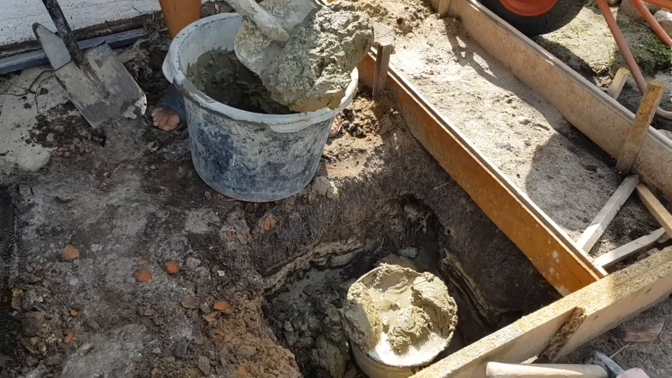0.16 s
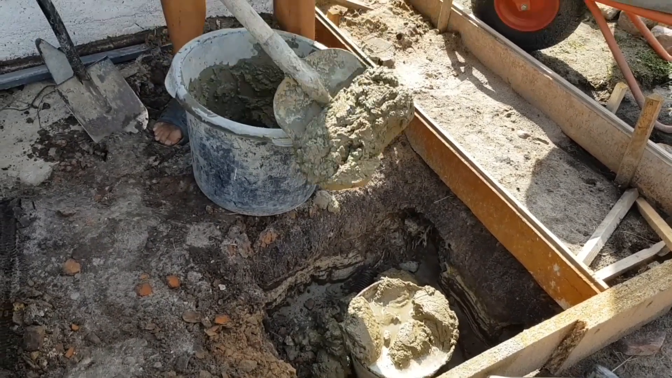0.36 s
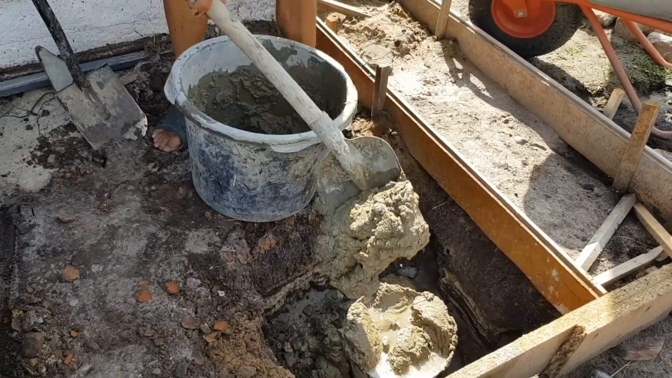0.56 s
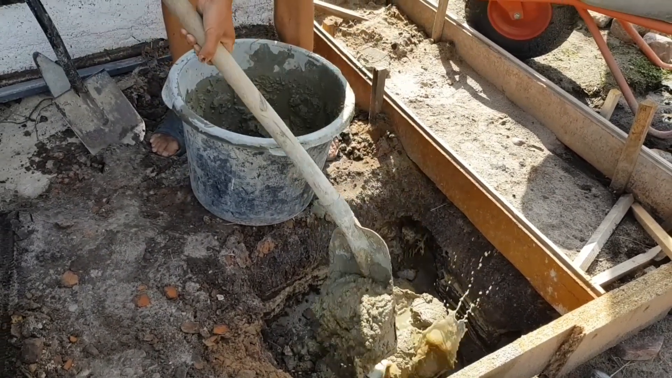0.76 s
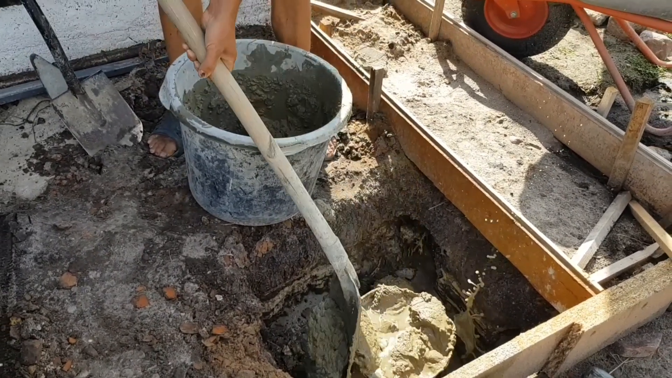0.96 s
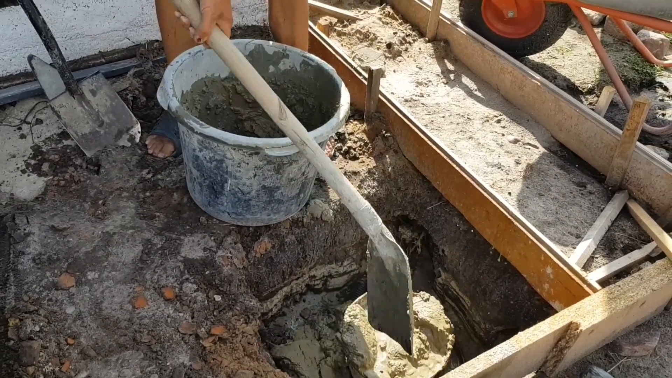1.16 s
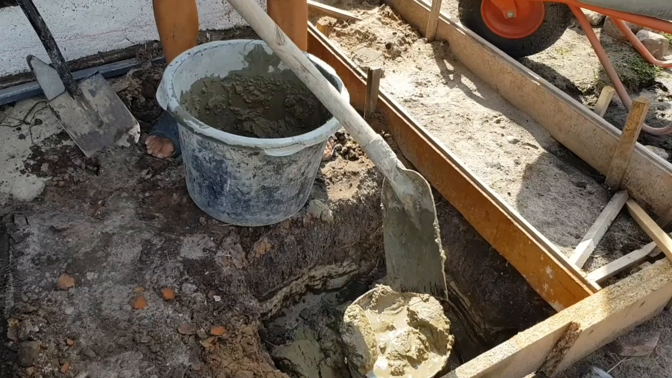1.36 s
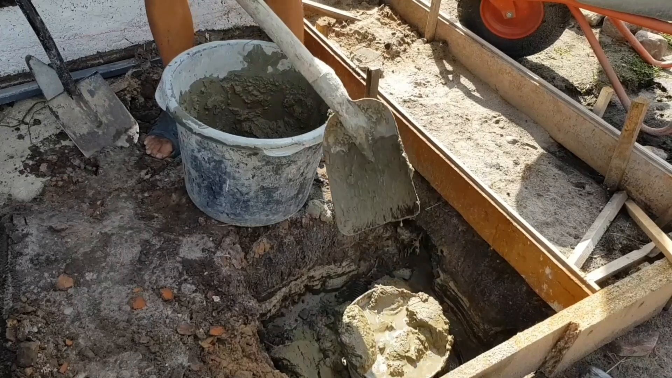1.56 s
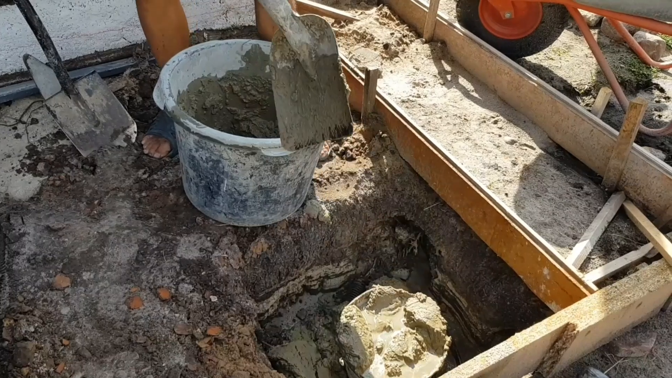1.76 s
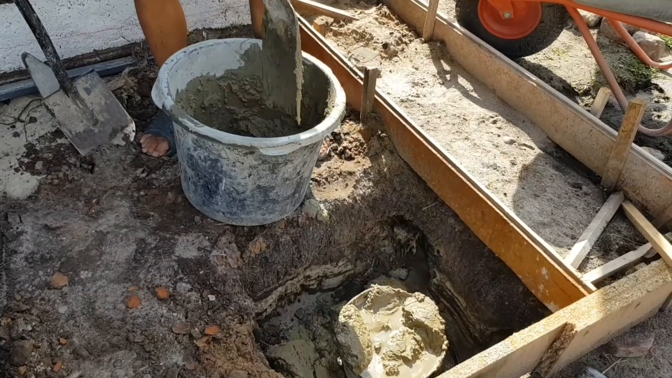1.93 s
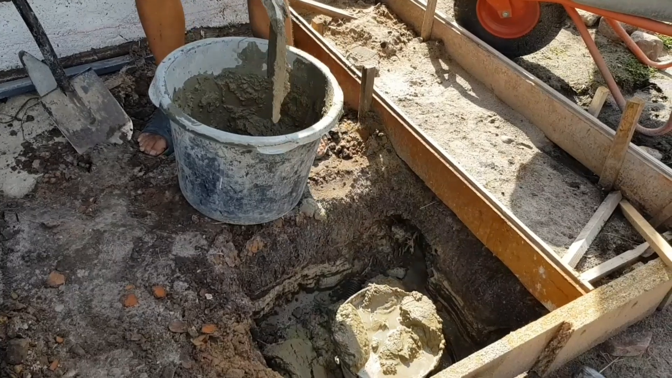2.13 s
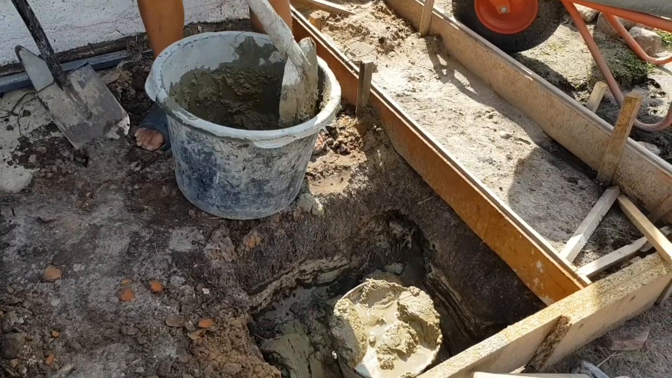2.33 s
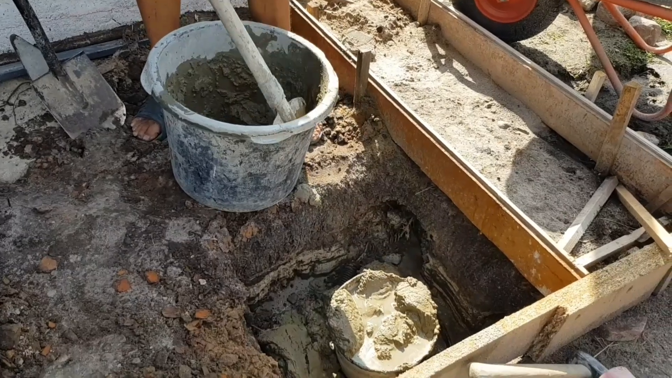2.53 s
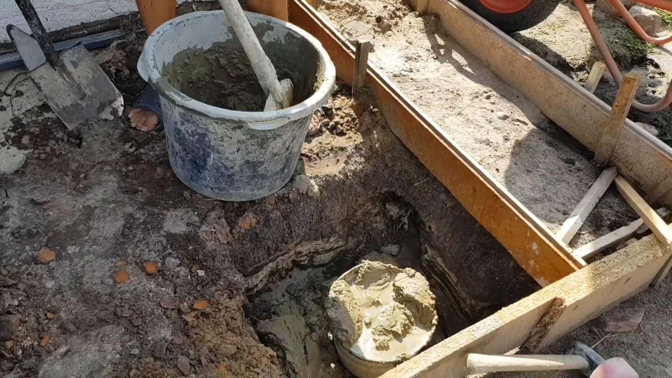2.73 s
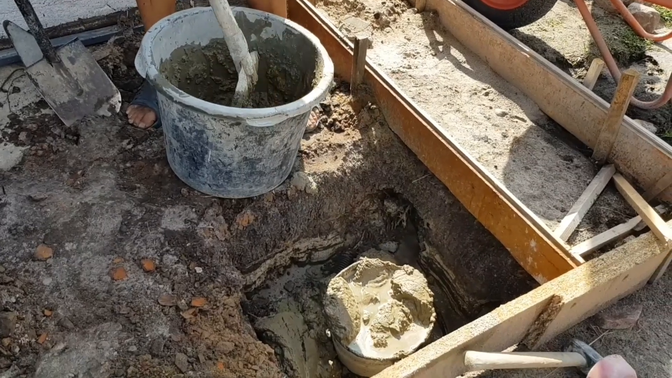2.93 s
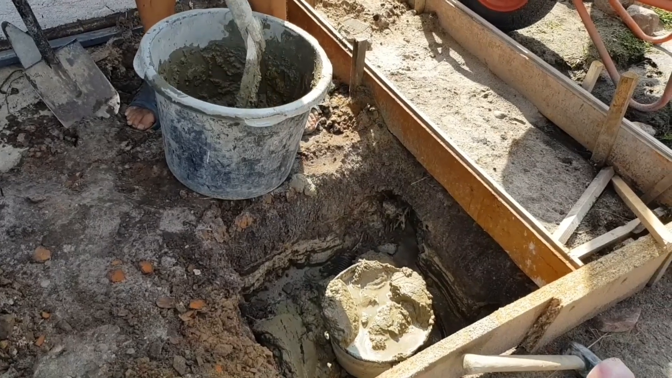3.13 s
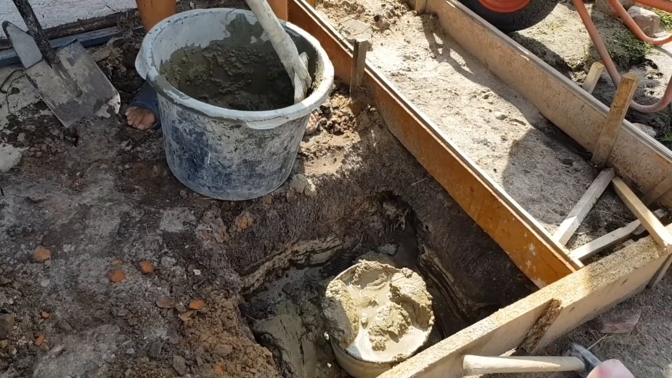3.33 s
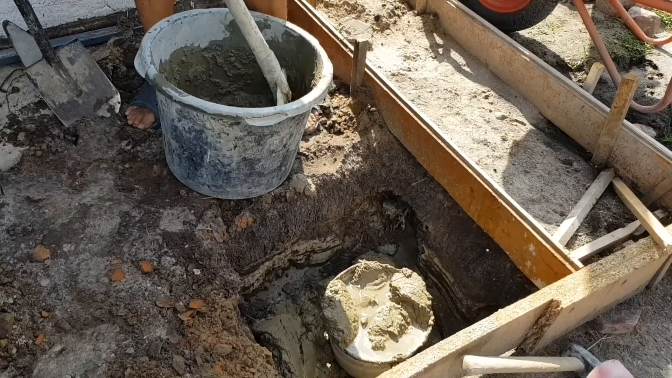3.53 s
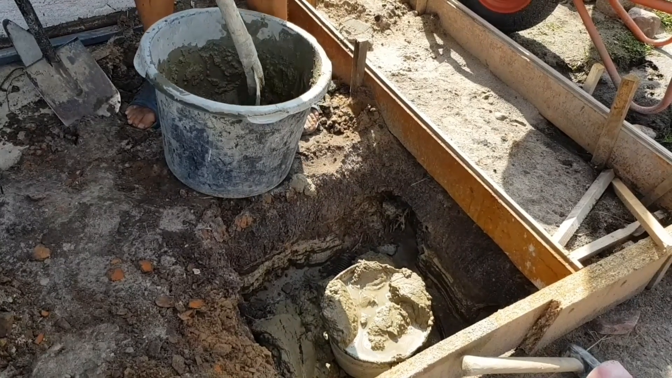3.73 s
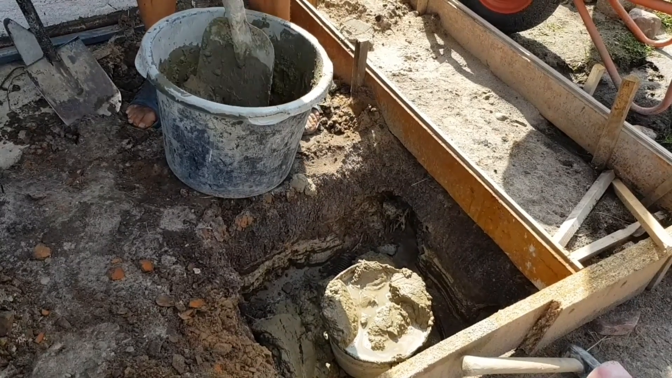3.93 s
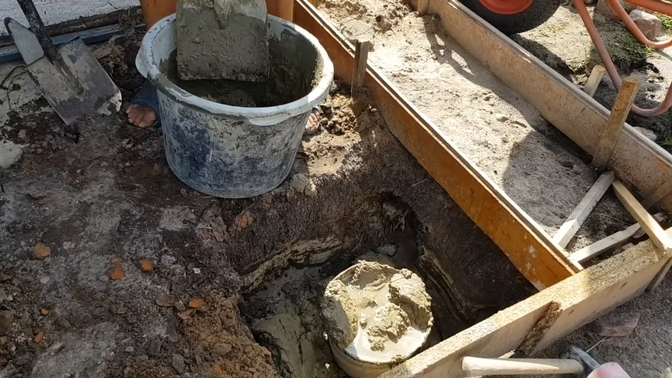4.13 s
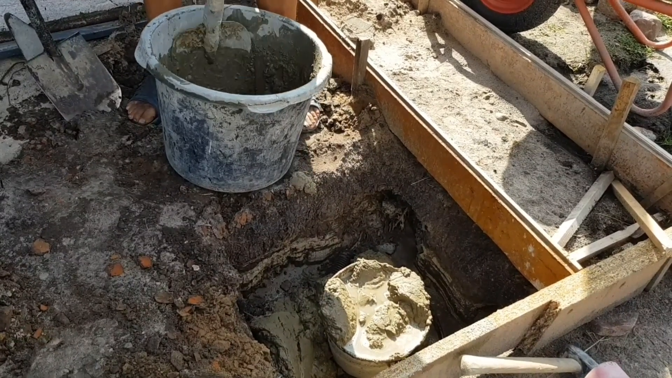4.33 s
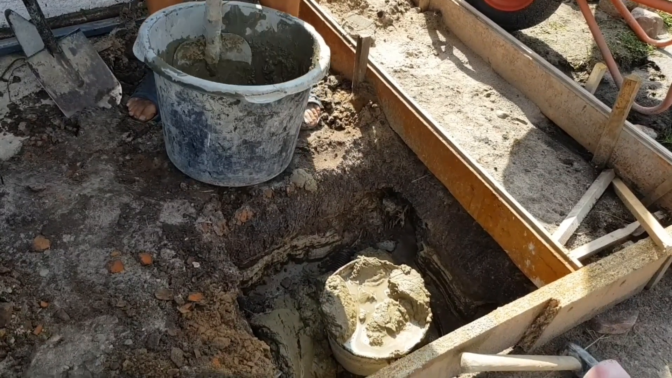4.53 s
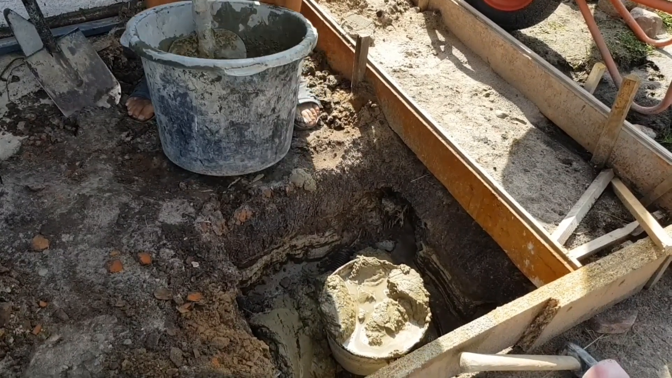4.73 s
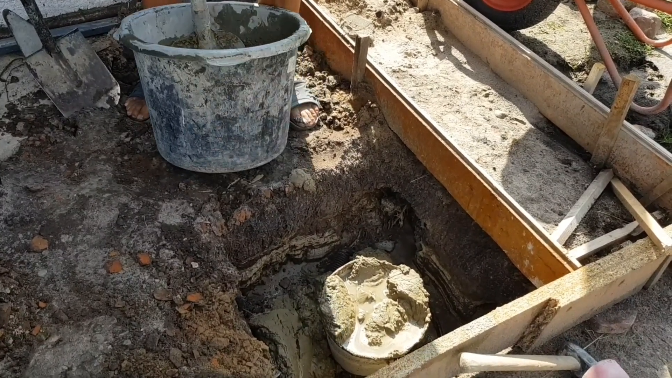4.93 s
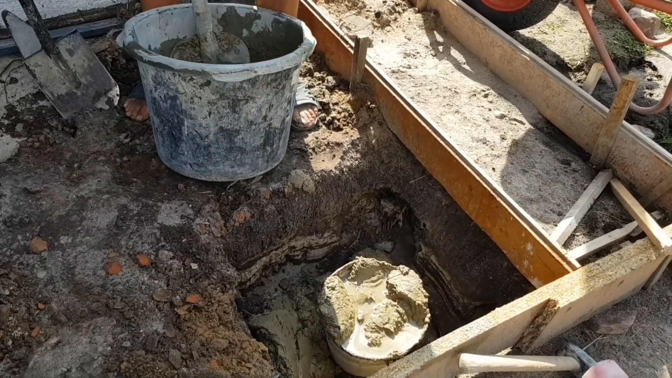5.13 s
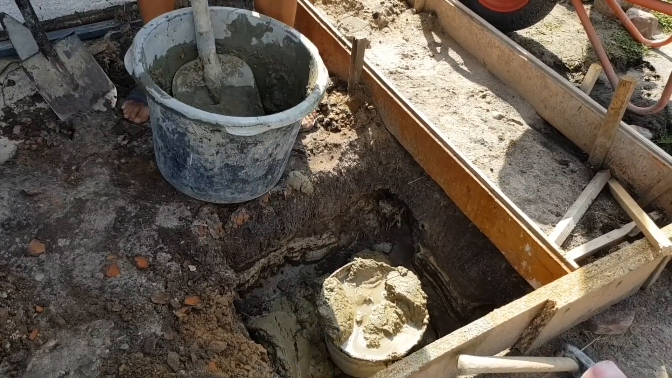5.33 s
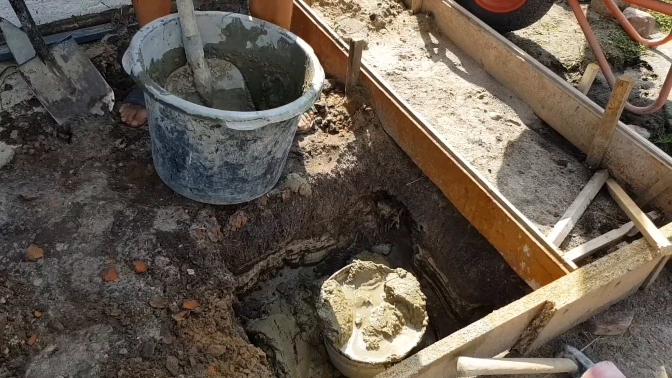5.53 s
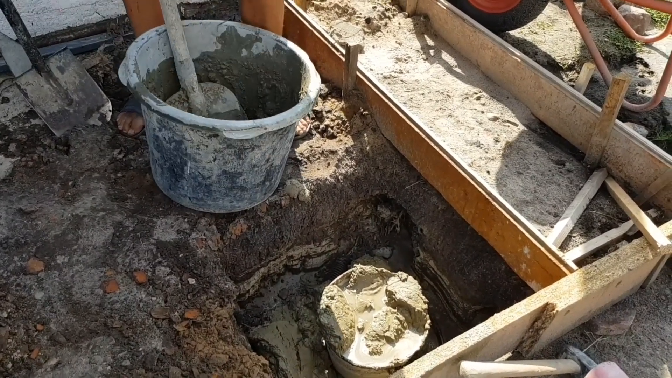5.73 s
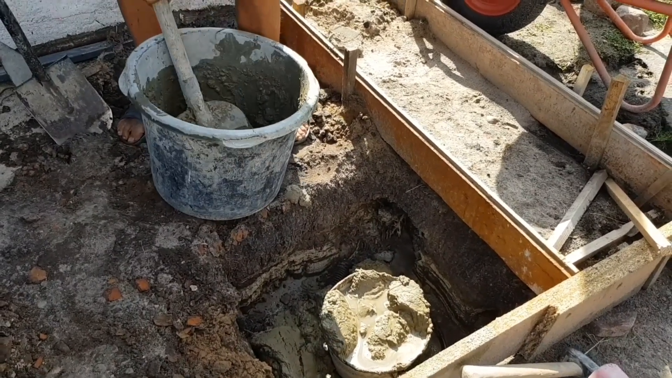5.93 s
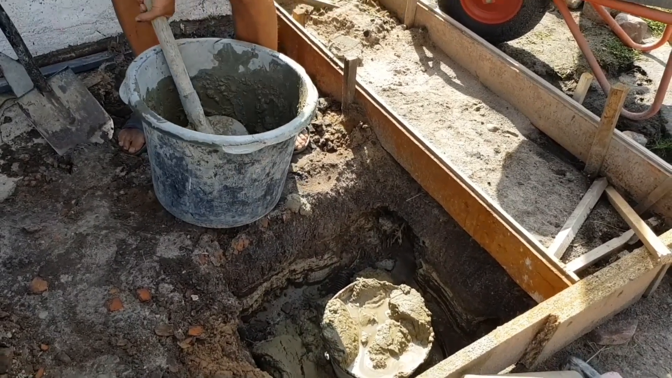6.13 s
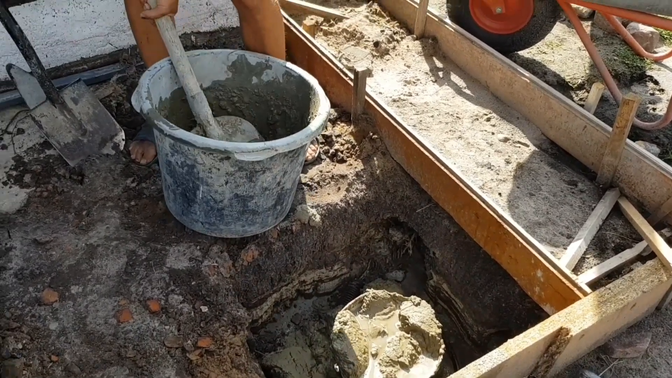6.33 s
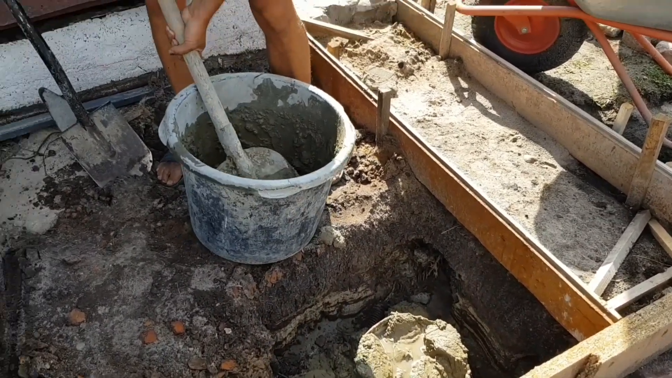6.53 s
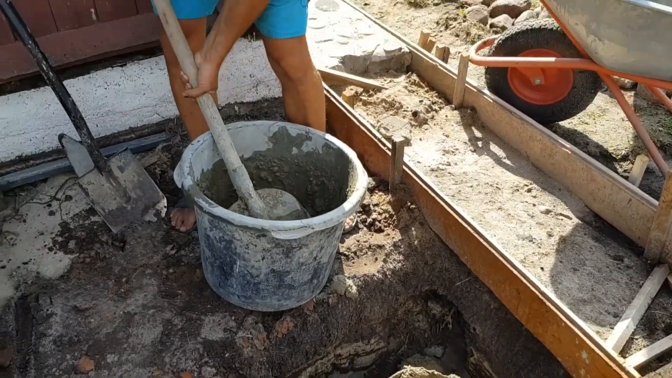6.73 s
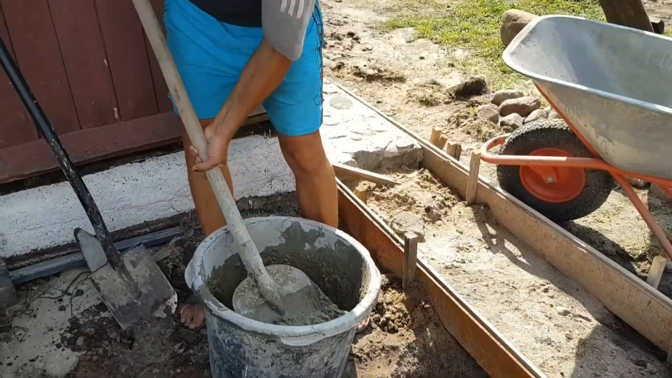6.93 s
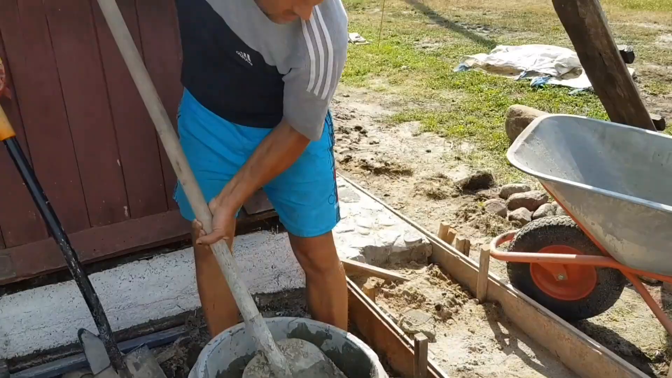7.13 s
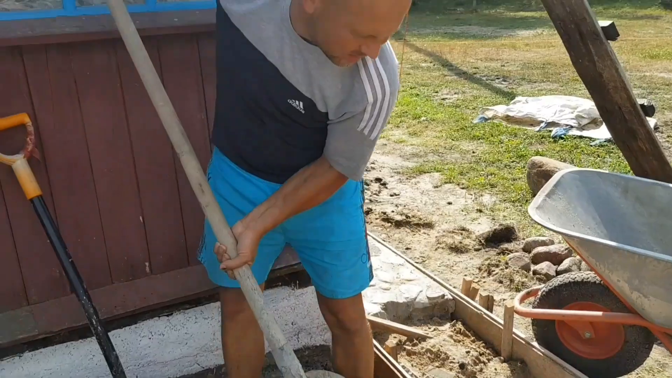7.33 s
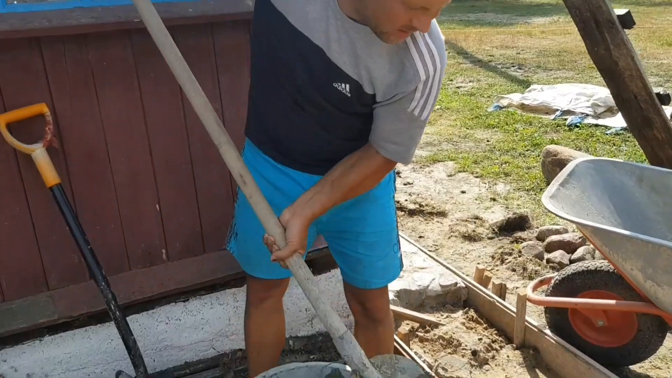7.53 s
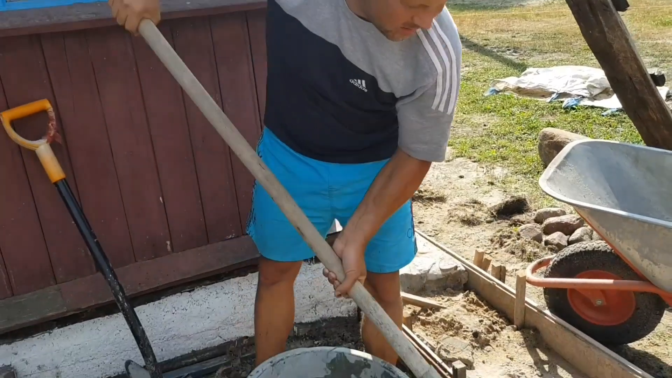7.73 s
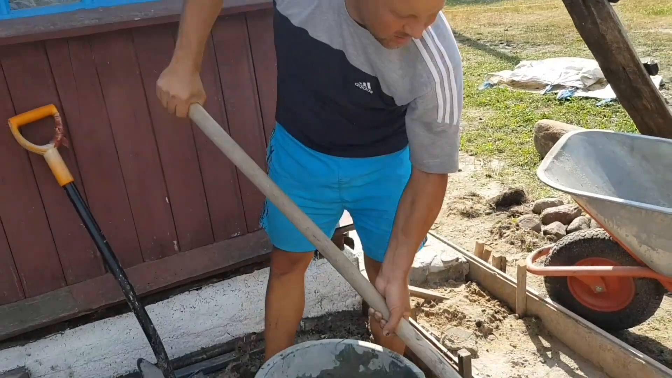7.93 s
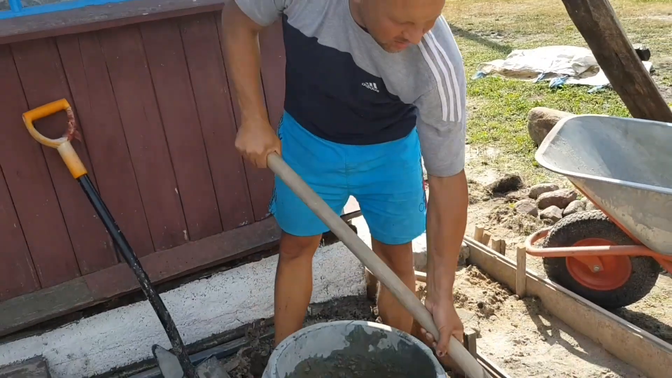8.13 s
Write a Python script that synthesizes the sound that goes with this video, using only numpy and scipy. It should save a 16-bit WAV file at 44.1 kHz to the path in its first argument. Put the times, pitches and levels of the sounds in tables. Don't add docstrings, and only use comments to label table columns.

```python
import sys
import numpy as np
from scipy import signal
from scipy.io import wavfile
from scipy.ndimage import uniform_filter1d

SR = 44100
rng = np.random.default_rng(int(sys.argv[2]) if len(sys.argv) > 2 else 0)


def log_audio(samples):
    frames = np.atleast_2d(samples).T
    limited = np.clip(frames, -1, 1)
    pcm = np.round(limited * 32767).astype(np.int16)
    wavfile.write(sys.argv[1], SR, pcm)


def ratio_of_db(decibels):
    return 10 ** (np.asarray(decibels, float) / 20)


N = 361179

# frequency in Hz, level in dB per Hz.
HUSH_SPECTRUM = [(35, -30), (60, -23), (91, 2), (166, -11.5), (381, -0.5), (695, -16), (1010, -9.5),
                 (1360, -15), (2710, -11), (6530, -13), (8420, -15.5), (13400, -14.5), (15000, -15)]
# time in seconds, level in dB.
FACING = [(0, -1.5), (1.3, 0.5), (1.602, -0.5), (5.05, 0), (6.9, 2), (7.2, -5), (7.62, -4.5), (7.75, 0.5),
          (8.19, 0.5)]
# frequency in Hz, left-right correlation.
FAR_ALIKE = [(60, 0.11), (240, 0.88), (950, -0.32), (3770, -0.83), (15000, -0.66)]
# frequency in Hz, left-right correlation.
NEAR_ALIKE = [(120, 0.8), (290, 0.95), (640, 0.78), (1400, 0.42), (3100, 0.5), (5000, 0.25), (15000, 0.2)]
# frequency in Hz, left minus right in dB.
SIDES = [(60, 0), (240, 0.5), (950, -1.3), (3770, -1.6), (15000, 1)]

# start in seconds, hold in seconds, level in dB.
GUSTS = [(0.131, 0.071, -42), (0.28, 0.027, -46.5), (0.492, .26, -45), (.84, 0.13, -57), (1.017, 0.11, -46),
         (1.19, 0.21, -58), (1.6, 0.08, -59), (1.933, 0.091, -56.5), (2.116, 0.049, -48),
         (2.23, 0.047, -48), (2.378, 0.23, -54), (2.7, 0.15, -68), (2.886, 0.22, -47), (3.18, .04, -47),
         (3.26, 0.089, -44), (3.43, 0.11, -42), (3.61, 0.32, -46.5), (3.986, 0.11, -47.5),
         (4.163, 0.5, -49), (4.553, 0.14, -55), (4.904, 0.062, -49), (5.28, 0.09, -53), (5.46, 0.69, -66),
         (6.277, 0.031, -56), (6.943, 0.099, -44), (7.093, 0.14, -53), (7.323, 0.07, -52),
         (7.436, 0.25, -53), (7.713, 0.17, -51), (7.946, 0.021, -36.5)]
# start in seconds, hold in seconds, level in dB.
EDDIES = [(0.136, 0.019, -42), (0.197, 0.016, -43), (0.28, 0.018, -46), (0.322, 0.013, -49.5),
          (0.495, 0.02, -50), (0.637, 0.018, -46), (0.67, 0.028, -43), (0.733, 0.017, -43.5),
          (0.782, 0.024, -47), (1.032, 0.023, -46), (1.142, 0.016, -54), (1.982, 0.024, -53),
          (2.106, 0.014, -51.5), (2.23, 0.014, -49.5), (2.38, 0.026, -44), (2.42, 0.017, -47),
          (2.443, 0.018, -49), (2.484, 0.032, -44), (2.538, 0.02, -54), (2.589, 0.016, -45),
          (2.884, 0.018, -45.5), (2.915, 0.023, -42.5), (2.971, 0.017, -41), (3.03, 0.022, -52),
          (3.063, 0.017, -40), (3.101, 0.017, -36), (3.171, 0.014, -37.5), (3.27, 0.026, -44.5),
          (3.304, 0.013, -42), (3.352, 0.032, -43.5), (3.464, 0.02, -42), (3.529, 0.021, -38),
          (3.706, 0.014, -48), (3.756, 0.015, -46), (3.838, 0.016, -44), (3.916, 0.024, -44.5),
          (3.992, 0.017, -42), (4.05, 0.022, -40.5), (4.128, 0.026, -50), (4.269, 0.016, -39),
          (4.303, 0.016, -49), (4.329, 0.019, -49), (4.354, 0.019, -42), (4.401, 0.033, -45),
          (4.473, 0.016, -42), (4.625, 0.015, -58), (4.907, 0.018, -44), (4.92, 0.013, -46),
          (4.968, 0.02, -47), (5.295, 0.021, -50), (5.339, 0.017, -47), (5.673, 0.036, -55),
          (5.895, 0.03, -52), (6.072, 0.016, -54), (6.427, 0.017, -53), (6.933, 0.021, -41.5),
          (6.967, 0.022, -39), (7.325, 0.032, -48), (7.73, 0.014, -42.5), (7.807, 0.02, -41)]
# frequency in Hz, level in dB per Hz.
BUFFET = [(13, -37), (22, -5), (49, 5.5), (70, 6.5), (105, -4), (162, -19), (200, 0.5), (260, -47),
          (440, -120)]

# frequency in Hz, width in Hz, level in dB.
TUB_MODES = [(120.5, 16, 3.5), (212.3, 61, 5), (258, 22, -1), (350, 21, -3.5), (472, 81, -2)]
# frequency in Hz, width in Hz, level in dB.
BLADE_MODES = [(591.8, 10.2, 3.5), (869, 57, -6), (1163, 5.6, 1.5), (1270, 6.4, -12), (1470, 5.5, -14),
               (1850, 62, 2), (2200, 160, -8), (2483, 16, 11), (3050, 13, -17.5)]
# frequency in Hz, width in Hz, level in dB.
THIN_EDGE_MODES = [(3610, 92, -2), (4136, 65, -3), (4880, 34, 5), (5510, 52, -1), (6283, 50, 0),
                   (6900, 59, 0.5), (7480, 200, 3.5)]
# frequency in Hz, level in dB per Hz.
GRIND = [(59, -43), (100, -29), (212, -12), (313, -2.5), (468, -9.5), (866, -3), (1040, -3), (1890, -3.5),
         (3600, -3), (4680, -44), (7920, -120)]
# frequency in Hz, level in dB per Hz.
SAND = [(1880, -31), (3200, -6), (5620, -5.5), (7130, -6), (8890, -10.5), (13900, -7), (15000, -13)]

# time in seconds, peak in dB, frequency in Hz, T60 in seconds.
THUDS = [(0.784, -28, 90, 0.074), (0.907, -28.5, 294, 0.044), (1.147, -26.5, 366, 0.088),
         (1.924, -32.5, 221, 0.2), (2.433, -13, 223, 0.1), (2.551, -20.5, 258, 0.099),
         (2.582, -22.5, 218, 0.12), (3.171, -26, 326, 0.033), (3.563, -33, 260, .06),
         (4.13, -37, 232, 0.058), (3.525, -19.5, 204, 0.095), (4.266, -26, 104, 0.063),
         (4.329, -24.5, 236, 0.11), (4.475, -24, 211, 0.06), (4.483, -26, 150, .1), (1.135, -34, 150, .1),
         (5.263, -27.5, 260, 0.27), (5.649, -38, 227, 0.11), (5.676, -34, 250, .1),
         (5.724, -33, 332, 0.088), (5.909, -35, 220, .08), (6.037, -24, 230, 0.12), (6.084, -34, 229, 0.13),
         (6.412, -43, 113, 0.2), (6.581, -22, 524, .03), (6.584, -19, 290, .04), (6.588, -17.5, 125, 0.16),
         (6.593, -23, 204, 0.15), (6.936, -29.5, 118, 0.13), (7.714, -51, 80, 0.13)]
# time in seconds, peak in dB, ring in Hz, crack re peak in dB, T60 in seconds.
KNOCKS = [(0.781, -22, 2580, -22, 0.036), (0.795, -29, 1640, -14, 0.04), (0.835, -33, 1400, -9, 0.079),
          (0.899, -27.5, 633, -3, 0.031), (1.106, -28, 2020, 2, 0.059), (1.123, -25.5, 495, -18, 0.09),
          (1.147, -28, 830, -17, 0.051), (1.924, -39, 403, -8, 0.069), (1.925, -28, 1010, -12, 0.035),
          (2.404, -29, 600, -12, 0.08), (2.422, -8, 1270, -26, 0.074), (2.425, -19, 2500, -20, .03),
          (5.48, -38, 1900, -10, .06), (3.169, -37.5, 560, -6, 0.04), (3.502, -31, 2400, -15, 0.06),
          (3.528, -21.5, 494, -1, 0.074), (4.266, -30, 450, -20, 0.059), (4.282, -31, 2600, -12, .03),
          (4.327, -29, 1100, -7, 0.063), (4.395, -19, 840, -14, .05), (4.424, -21, 895, -14, .05),
          (4.445, -15.5, 780, -12, 0.035), (4.454, -15, 1500, -9, 0.047), (2.484, -28, 700, -10, .04),
          (2.512, -24, 1500, -12, .04), (2.547, -18, 1320, -12, .04), (3.392, -39, 460, -15, .03),
          (3.455, -25, 2600, -8, .03), (5.159, -35, 536, -15, .04), (5.192, -28, 1010, -15, .04),
          (5.3, -25, 824, -8, 0.058), (5.381, -35, 476, -15, .05), (5.252, -29, 523, 0, 0.024),
          (5.479, -31, 1190, -11, 0.19), (5.621, -26.5, 1330, -12, 0.11), (6.411, -34.5, 474, -23, 0.25),
          (8.169, -43, 2000, -5, 0.045)]
# start in seconds, length in seconds, frequency in Hz, # width in Hz, level in dB.
RASPS = [(0, 0.063, 2440, 350, -53.5), (0, 0.086, 1480, 199, -61), (0.534, 0.089, 2300, 250, -58.5),
         (1.028, 0.025, 1850, 250, -52), (1.069, 0.011, 1940, 200, -43), (5.15, 0.064, 1160, 250, -48.5),
         (5.62, 0.26, 93, 49.5, -53), (5.25, 0.06, 520, 200, -39), (5.31, .09, 480, 150, -46),
         (5.273, .12, 1830, 500, -42.5), (3.501, 0.014, 2500, 500, -33), (3.503, .014, 1900, 500, -35),
         (5.949, 0.092, 2120, 400, -50), (6.58, 0.013, 520, 300, -30), (6.588, 0.083, 373, 263, -43.5),
         (7.699, 0.23, 342, 194, -62), (5.6, 0.042, 1350, 600, -44), (5.6, 0.18, 472, 89, -46.5),
         (5.86, 0.23, 474, 90, -52.5), (5.883, 0.23, 935, 200, -49.5), (5.74, .055, 1060, 150, -53),
         (5.763, 0.051, 1930, 250, -57), (1.488, 0.056, 246, 60, -57.5), (6.596, .04, 1380, 200, -49.5),
         (6.745, .065, 170, 50, -54), (7.165, .05, 745, 150, -62), (8.17, .03, 750, 300, -53.5),
         (5.31, 0.031, 1900, 200, -41), (6.749, 0.042, 1370, 200, -51), (6.94, 0.09, 2450, 150, -60),
         (7.02, .05, 2300, 500, -61), (6.982, 0.048, 855, 150, -54.5), (7.141, 0.076, 2500, 900, -59),
         (7.543, 0.03, 2890, 800, -53), (7.73, 0.19, 2470, 150, -61), (7.862, 0.094, 2890, 600, -58.5),
         (7.932, 0.14, 3050, 350, -65), (7.56, .1, 330, 120, -60)]
# start in seconds, hold in seconds, stones on the edge in dB,
# load on the blade in dB, sandiness in dB.
BITES = [(1.112, 0.056, -47.5, 1.5, 3.5), (2.408, .04, -38, 0.5, 3.5), (2.452, .048, -35.5, -0.5, 0.5),
         (2.507, 0.023, -32, -9, -1), (2.543, 0.025, -33.5, -1.5, 0.5), (2.58, 0.015, -46.5, 3, 4),
         (3.405, 0.019, -45.5, 3.5, 7.5), (3.435, 0.029, -37.5, -2, 0.5), (4.285, .015, -39, 0, -4),
         (4.305, .015, -43, 1, 2), (4.329, .025, -32, -1, 1), (4.368, 0.033, -31.5, -3.5, 2.5),
         (4.394, 0.051, -29, -3.5, -1), (4.443, 0.027, -31, -4.5, -1.5), (4.83, 0.023, -52.5, 2.5, -4),
         (5.15, 0.074, -50.5, 0, -0.5), (5.222, .02, -50, -3, 0), (5.258, 0.046, -42.5, 3.5, 4),
         (5.305, 0.033, -41.5, 3, -6), (5.376, 0.0098, -50, 5, -20), (5.605, 0.036, -51, 4, 2),
         (6.572, 0.062, -51.5, -11, -1), (6.77, 0.027, -51.5, 3.5, 2)]
# start in seconds, hold in seconds,
# stones on the edge in dB, load on the blade in dB, sandiness in dB.
SLIDES = [(.01, 0.05, -57.5, -3.5, 0), (.29, 0.022, -65.5, -13, 3), (.52, 0.23, -59, -5.5, 8.5),
          (.81, 0.11, -53, -3.5, 4.5), (1.02, 0.096, -56, -13, 7.5), (1.42, 0.036, -68, -15, 10),
          (1.5, 0.015, -61.5, -20, 11.5), (.12, 0.21, -80.5, 8.5, 5), (1.48, 0.6, -73, 5, -16),
          (2.65, 0.16, -63.5, 1.5, 4), (2.9, 0.2, -58, -8.5, 5.5), (3.58, .35, -60.5, -4, 4.5),
          (4.1, 0.27, -79, 8.5, 17), (4.55, 0.26, -61.5, -4.5, 3), (4.9, 0.042, -62.5, -1, 7.5),
          (5.24, 0.12, -51.5, -0.5, 6), (5.66, 0.062, -52.5, 1, 0), (5.775, .02, -58.5, 2, 2.5),
          (5.83, .04, -66, 5, 2), (5.89, 0.03, -59, 2, 1), (5.96, .03, -51, -4, -2),
          (5.995, 0.08, -51, 1.5, 1), (6.17, 0.016, -81, 11.5, -3), (6.31, .08, -68, 3, -3),
          (6.44, .05, -66, 4, 0), (6.53, 0.1, -59, 0, 3.5), (3.02, .03, -55, -10, 3),
          (6.92, .13, -62, 1.5, 6.5), (7.14, 0.079, -62, -4, 6.5), (7.3, 0.33, -72, -9, 11.5),
          (7.75, 0.56, -67, -21, 11)]
# start in seconds, hold in seconds,
# stones on the edge in dB, load on the blade in dB, sandiness in dB.
SPLATS = [(.781, 0.0051, -36, -9, 2.5), (.901, 0.0047, -40, 3, 7), (1.925, 0.005, -41.5, 4.5, 1),
          (3.17, 0.0099, -60.5, 7, 12), (3.502, 0.025, -36.5, -4, -2), (5.481, 0.023, -53.5, 6, -2),
          (6.411, 0.015, -54.5, 0.5, 0), (7.545, 0.0097, -61, -8, 9), (8.185, .02, -54, -1.5, 9)]
# edge, blade body, sand and tub wall, all in dB.
SETTLING = (-71, -85, -79.5, -79.5)
# time in seconds,
# delay of the right port in samples.
RIGHT_LAG = [(0, 2), (.45, 2), (.55, -4), (1.4, -4), (1.6, 2), (4.0, 2), (4.15, 5), (6.3, 4), (7.0, 0)]


def rms_one(x):
    return x / np.sqrt(np.mean(x ** 2) + 1e-20)


def power_of(db):
    return ratio_of_db(2 * np.asarray(db))


def at_hz(points, hz):
    points_hz, values = np.transpose(points)
    return np.interp(np.log(hz), np.log(points_hz), values)


def over_time(points):
    return np.interp(np.arange(N) / SR, *np.transpose(points))


def drift(rate):
    step = 40
    r = np.exp(-2 * step * np.pi * rate / SR)
    noise = rng.standard_normal(N // step + 2002)
    slow = signal.lfilter([1], [1, -2 * r, r * r], noise)[2000:]
    return np.interp(np.arange(N) / step, np.arange(len(slow)), rms_one(slow))


def resonate(x, hz, width_hz):
    r = np.exp(-np.pi * width_hz / SR)
    poles = [1, -2 * r * np.cos(2 * np.pi * hz / SR), r * r]
    return signal.lfilter([(1 - r * r) / 2, 0, (r * r - 1) / 2], poles, x)


def add(out, s, sound):
    at = round(s * SR)
    out[:, at:at + sound.shape[-1]] += sound[..., :N - at]


def coloured(source, spectrum, alike_by_hz, low_hz, high_hz, patchy_db, modes=(), modes_db=0):
    edges = np.geomspace(low_hz, high_hz, int(2.5 * np.log2(high_hz / low_hz)) + 2)
    bands = []  # (Hz, extra dB, mid and side signals)
    for k, (low, high) in enumerate(zip(edges, edges[1:])):
        band_pass = signal.butter(2, [low, high], "band", fs=SR, output="sos")
        bands.append((np.sqrt(low * high), 0, signal.sosfilt(band_pass, source[k % 2])))
    for k, (hz, width_hz, db) in enumerate(modes):
        mode_db = modes_db + db + 4.0 * drift(6.8)
        bands.append((hz, mode_db, resonate(source[k % 2], hz, width_hz)))
    out = 0
    for hz, extra_db, (mid, side) in bands:
        alike = np.clip(at_hz(alike_by_hz, hz), 0, 1)
        gain = ratio_of_db(at_hz(spectrum, hz) + extra_db + patchy_db * drift(23.0))
        mid = gain * np.sqrt(1 + alike) * mid
        side = gain * np.sqrt(1 - alike) * side
        balance = ratio_of_db(at_hz(SIDES, hz) * np.array([[.5], [-.5]]))
        out = out + balance * np.array([mid + side, mid - side])
    return rms_one(out)


def swells(rows, levels_db, rise_db_per_s, fall_db_per_s):
    t = np.arange(0, N + 64, 64) / SR
    start, hold = np.array(rows)[:, :2, None].transpose(1, 0, 2)
    rise_db = -rise_db_per_s * np.maximum(start - t, 0)
    fall_db = -fall_db_per_s * np.maximum(t - start - hold, 0)
    powers = power_of(levels_db) @ power_of(rise_db + fall_db)
    return np.array([np.interp(np.arange(N) / SR, t, p) for p in powers])


def open_air():
    noise = rng.standard_normal((2, 2, N))
    hush = coloured(noise, HUSH_SPECTRUM, FAR_ALIKE, 58.4, 15130, patchy_db=1.6)
    return ratio_of_db(-57.5 + 1.5 + over_time(FACING)) * hush


def wind():
    calm_db, between_eddies_db = -67, -5.5
    gusts_db, eddies_db = np.transpose(GUSTS)[-1:], np.transpose(EDDIES)[-1:]
    puffs = swells(GUSTS, gusts_db + between_eddies_db, rise_db_per_s=602, fall_db_per_s=330)
    puffs = puffs + power_of(calm_db)
    puffs = puffs + swells(EDDIES, eddies_db, rise_db_per_s=700, fall_db_per_s=502)
    noise = rng.standard_normal((2, 2, N))
    swirls = coloured(noise, BUFFET, [(30, 0.078), (150, 0.039)], 34.1, 196.2, patchy_db=1.5)
    swirls = swirls / np.sqrt(uniform_filter1d(swirls ** 2, size=900) + .05)
    exposure = ratio_of_db(np.array([[3.0], [-2.5]]))
    return np.sqrt(puffs) * exposure * swirls


def thuds():
    out, t = np.zeros((2, N)), np.arange(14000) / SR
    for s, peak_db, hz, t60 in THUDS:
        width_hz = np.log(1000) / np.pi / max(t60, .02)
        push = np.sin(np.pi * np.clip(t * hz * 3.6, 0, 1)) ** 2
        swing = 3.1 * resonate(push, hz, width_hz)
        for tub_hz, _, db in TUB_MODES:
            swing += ratio_of_db(db + rng.normal(0, 1.8)) * resonate(push, tub_hz, 0.6 * width_hz)
        add(out, s, ratio_of_db(peak_db - 5.0) * swing / np.abs(swing).max())
    return out


def grit(count):
    noise = rng.standard_normal((3, count))
    return noise[0] + 0.38 * noise[1:]


def knocks():
    out, t = np.zeros((2, N)), np.arange(6000) / SR
    treble = signal.butter(2, 3500, "high", fs=SR, output="sos")
    for s, peak_db, hz, crack_db, t60 in KNOCKS:
        fall = ratio_of_db(-60 * t / max(t60, .008)) + 2.5 * ratio_of_db(-60 * t / .015)
        spray = grit(len(t)) * fall * np.minimum(t / 0.0029, 1)
        ring = resonate(resonate(spray, hz, .4 * hz), hz, hz)
        ring = ring + .3 * resonate(spray, 1.3 * hz, 1.6 * hz)
        crack = signal.sosfilt(treble, spray)
        blow = ring / np.abs(ring).max() + ratio_of_db(crack_db) * crack / np.abs(crack).max()
        add(out, s, ratio_of_db(peak_db - 1.5) * blow)
    return out


def rasps():
    out, t = np.zeros((2, N)), np.arange(12000) / SR
    for s, length, hz, width_hz, level_db in RASPS:
        swell = np.sin(np.pi * np.clip(t / length, 0, 1)) ** 0.38
        drag = resonate(grit(len(t)), hz, width_hz)
        drag = resonate(resonate(drag, hz, 2 * width_hz), hz, 2 * width_hz)
        add(out, s, ratio_of_db(level_db) * swell * rms_one(drag))
    return out


def grains(per_s, spread_db, clump_db):
    born = rng.random((4, N)) < per_s * ratio_of_db(clump_db * drift(40.0)) / SR
    spread = ratio_of_db(spread_db * np.minimum(rng.exponential(1, N), 3.0))
    sizes = spread * rng.standard_normal((4, N))
    return rms_one(born * sizes + 1e-9).reshape(2, 2, N)


def contact(rows, tub_db, rise_db_per_s, fall_db_per_s):
    edge, load, sandy = np.transpose(rows)[2:]
    wall = edge + tub_db + 1.7 * load
    return swells(rows, (edge, edge + load, edge + sandy, wall), rise_db_per_s, fall_db_per_s)


def scraping():
    power = contact(BITES, tub_db=-2, rise_db_per_s=713, fall_db_per_s=467)
    power = power + power_of(SETTLING)[:, None]
    power = power + contact(SPLATS, tub_db=-2.5, rise_db_per_s=1800, fall_db_per_s=552)
    power = power + contact(SLIDES, tub_db=3, rise_db_per_s=145, fall_db_per_s=185)
    stones = grains(2800.0, spread_db=3.0, clump_db=1.2)
    edge = coloured(stones, GRIND, NEAR_ALIKE, 1240, 2830, patchy_db=1.5,
                    modes=BLADE_MODES[4:], modes_db=-4.0)
    body = coloured(stones, GRIND, NEAR_ALIKE, 574, 1370, patchy_db=3.5,
                    modes=BLADE_MODES[:4], modes_db=7.0)
    tub = coloured(stones, GRIND, NEAR_ALIKE, 145.0, 577, patchy_db=2.5, modes=TUB_MODES, modes_db=2.5)
    fine = grains(5500.0, spread_db=1.5, clump_db=1.5)
    sand = coloured(fine, SAND, NEAR_ALIKE, 2840, 14600, patchy_db=1.56,
                    modes=THIN_EDGE_MODES, modes_db=-2.0)
    return sum(np.sqrt(p) * layer for p, layer in zip(power, (edge, body, sand, tub)))


def scene():
    background = open_air() + wind()
    work = thuds() + knocks() + rasps() + scraping()
    lag = over_time(RIGHT_LAG).round().astype(int)
    work[1] = work[1][np.clip(np.arange(N) - lag, 0, N - 1)]
    return background + work


def roll_off(x):
    return signal.sosfilt(signal.butter(12, 14660, fs=SR, output="sos"), x)


def record(dry):
    top_cut = signal.ellip(12, .1, 70, 14560, fs=SR, output="sos")
    mix = signal.sosfilt(top_cut, dry)
    return roll_off(mix)


dry = scene()
out = record(dry)
log_audio(out)
```